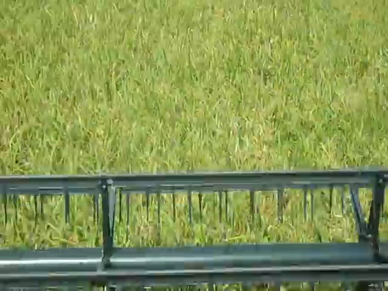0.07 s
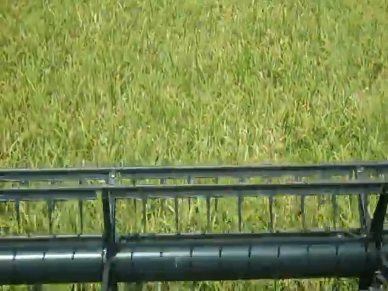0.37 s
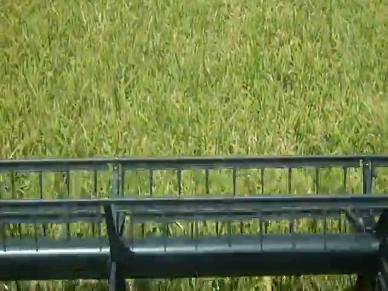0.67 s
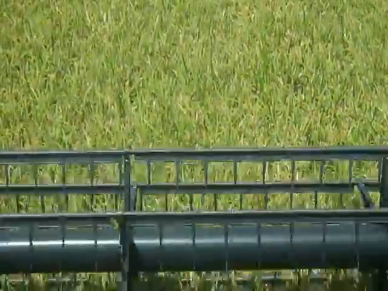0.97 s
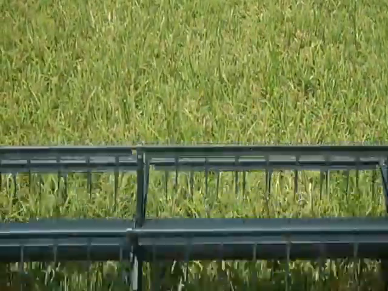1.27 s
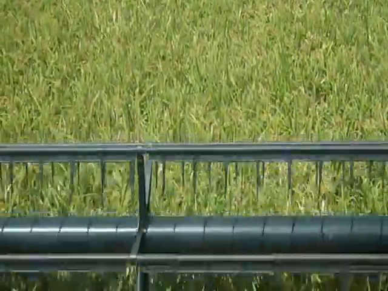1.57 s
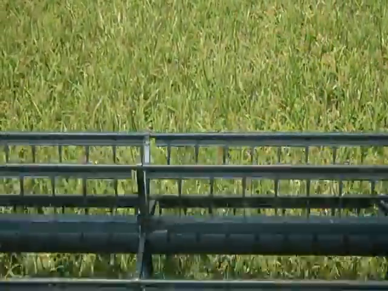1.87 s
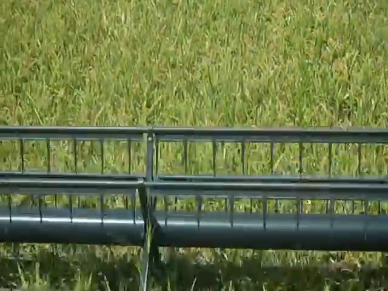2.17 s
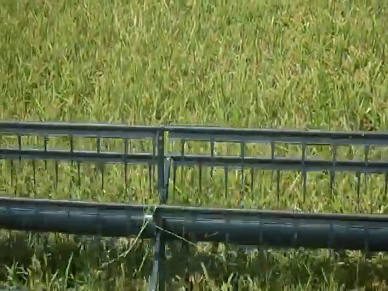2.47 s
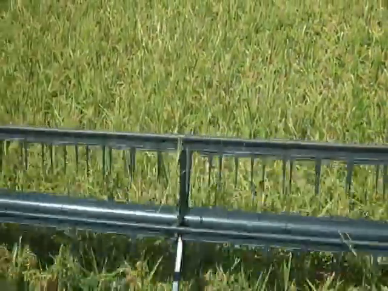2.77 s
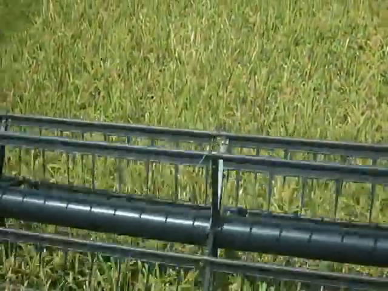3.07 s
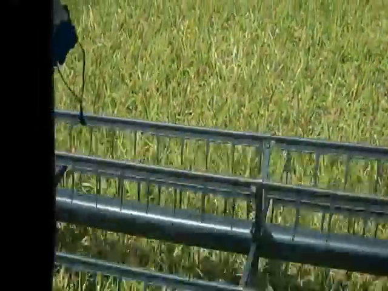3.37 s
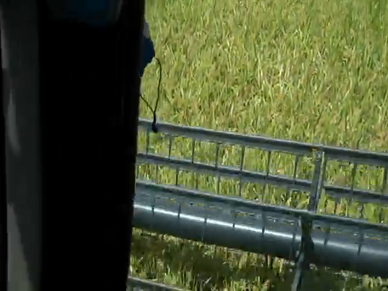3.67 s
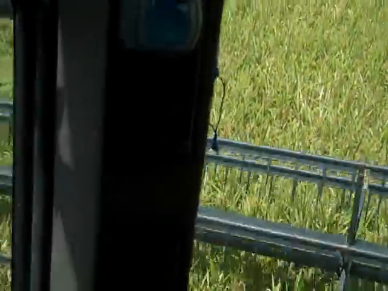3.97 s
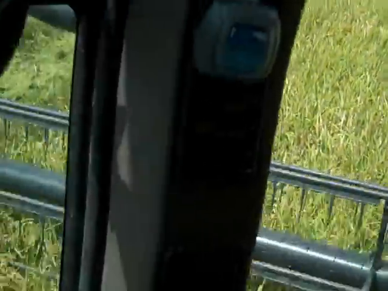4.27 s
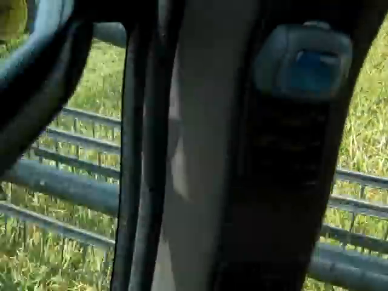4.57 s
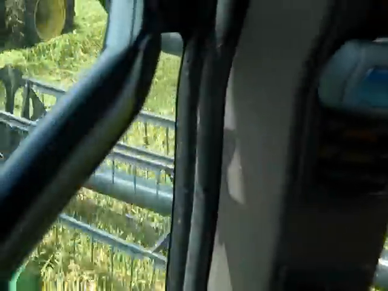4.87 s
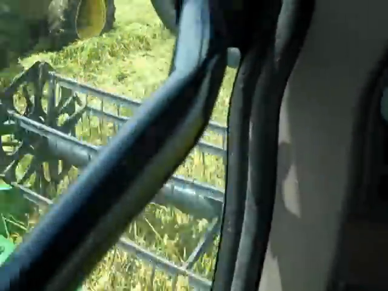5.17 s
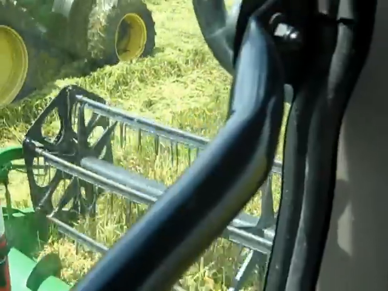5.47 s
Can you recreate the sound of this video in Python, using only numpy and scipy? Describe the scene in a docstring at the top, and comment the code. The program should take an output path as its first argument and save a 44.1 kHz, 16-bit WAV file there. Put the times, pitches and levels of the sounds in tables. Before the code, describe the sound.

A combine harvester cuts grain at full throttle, heard from inside the cab. A deep hum and boom stutter in, then throb steadily under the hiss and rattle of crop, thin gear whines and a faintly ringing loose guard. Gusts of air thump the hand-held microphone and a few knocks sound nearby. Past the middle the level dips briefly, a puff makes a sharp click on the left, and the hiss shifts colour as the microphone turns.

```python
"""A deep hum and boom stutter in: a combine harvester cutting grain at full throttle, from inside the cab.
The diesel and its drives hum, the cab booms, surges and throbs with the cutter, crop hisses and rattles
through the header, gears whine and a loose guard rings. The hand-held microphone turns from the
windscreen to the side window; gusts and puffs of air thump it, and on the hardest puff the left channel
overloads and clicks. Now and then something knocks in the cab, or the level dips briefly."""
import sys
import numpy as np
from scipy import signal
from scipy.fft import rfft, irfft
from scipy.io import wavfile
from scipy.ndimage import uniform_filter1d, map_coordinates

SR = 44100
rng = np.random.default_rng(int(sys.argv[2]) if len(sys.argv) > 2 else 0)


def materialize(psi):
    """Save the field psi as 16-bit PCM at rate SR to the path in sys.argv[1].

    A 1-D psi becomes a single channel; in a 2-D psi each row is a channel.
    """
    bounded = np.clip(np.atleast_2d(psi).T, -1, 1)
    quanta = np.round(bounded * 32767).astype(np.int16)
    wavfile.write(sys.argv[1], SR, quanta)


N = 247842
TIME_S = np.arange(N) / SR
CRANK_HZ, THROB_HZ = 37.7, 8.183   # usual crank speed; the cutter's throb


# The governed crank speed, sagging under load: time_s, speed_hz
CRANK_SPEED = [(0, 37.76), (1.4, 37.76), (1.9, 37.59), (2.4, 37.59), (2.8, 37.77), (3.6, 37.72),
               (4.7, 37.72), (5.2, 37.8)]
def crankshaft():
    """Turns made so far by the diesel's crank."""
    return np.cumsum(in_time(CRANK_SPEED)) / SR


# The diesel, heard from the cab: crank_multiple, level_db
DIESEL_ORDERS = [(1, -37), (2, -38), (30, -48.5)]
# Shafts and belts at the usual crank speed: pitch_hz, level_db
SHAFT_TONES = [(29.2, -33), (50.3, -33.5), (106.5, -32.5), (114.2, -30)]
# Lines beating around the fifth and tenth crank orders: crank_multiple, throb_multiple, level_db, lag_s
CHUG_LINES = [(5, -3, -39, 0), (5, -2, -33.5, 0), (5, -1, -29.5, 0), (5, 0, -27.5, 0), (5, 1, -37.5, 0),
              (5, 2, -41, 0), (10, 0, -33, .03), (10, 1, -39, .03)]
# The chugging grows and eases with the load: time_s, gain_db
CHUG_LOAD = [(0.4, -.5), (0.7, 0), (1.25, 0.5), (1.5, 2), (2.2, -1.5), (2.55, -1.5), (2.95, -2), (3.15, 1),
             (3.7, -0.5), (4.15, 1.5), (4.6, -2.5), (5.5, -0.5)]
def engine(crank, throb):
    """The diesel and its shafts hum; lines around the fifth and tenth crank orders fall in step once a throb
    and chug."""
    diesel = sum(from_db(db) * tone(order * crank, waver_db=3.5) for order, db in DIESEL_ORDERS)
    shafts = sum(from_db(db) * tone(hz / CRANK_HZ * crank, waver_db=1) for hz, db in SHAFT_TONES)
    chug = 0
    for order, step, db, lag_s in CHUG_LINES:
        turns = order * crank + step * (throb - lag_s * THROB_HZ)
        chug += np.sqrt(2) * np.cos(2 * np.pi * turns) * from_db(db + .8 * drift(2))
    return diesel + shafts + chug * from_db(in_time(CHUG_LOAD))


# The boom of the cab, all round the microphone: frequency_hz, level_db
BOOM_SPECTRUM = [(45, -23), (62, -6), (85, 0), (100, 0.5), (125, -3.5), (145, 2), (165, -4), (195, -9),
                 (230, -13.5), (300, -16)]
# Its slow rise and fall: time_s, level_db
BOOM_SWELL = [(0.3, -19.5), (0.65, -15.5), (1.1, -16.5), (1.7, -20.5), (2.0, -16), (2.55, -19.5),
              (3.05, -16.5), (3.7, -15.5), (4.85, -17.5), (5.45, -13.5)]
def cab_boom(stroke):
    """Dense knocks from the threshing gear boom in the cab, throbbing with the cutter's stroke."""
    boom = steady(in_cab(impacts(per_s=1500, spread_db=2), BOOM_SPECTRUM), span_s=.12)
    return boom * from_db(in_time(BOOM_SWELL) + stroke)


# Brief low swells of the boom in the cab: peak_s, half_length_s, pitch_hz, level_db
BOOM_SURGES = [(0.313, 0.014, 123.0, -8.5), (0.615, 0.013, 118.0, -12.5), (0.661, 0.027, 100.0, -11.8),
               (0.818, 0.02, 114.0, -16.5), (0.89, 0.027, 103.0, -16), (0.95, 0.022, 138.0, -14),
               (1.925, 0.012, 111.0, -15), (1.996, 0.019, 114.0, -10), (2.187, 0.02, 105.0, -13.1),
               (2.275, 0.021, 114.0, -10.5), (2.823, 0.01, 114.0, -9), (2.953, 0.0084, 107.0, -7),
               (3.188, 0.0082, 113.0, -15), (3.596, 0.014, 105.0, -15), (3.647, 0.019, 110.0, -12.0),
               (3.833, 0.015, 122.0, -10.5), (3.964, 0.026, 101.0, -14.5), (4.185, 0.016, 125.0, -14),
               (4.406, 0.012, 102.0, -11), (4.488, 0.017, 125.0, -12), (4.694, 0.014, 121.0, -13.5),
               (4.992, 0.022, 112.0, -11.5), (5.067, 0.01, 104.0, -6.5), (5.245, 0.013, 118.0, -12),
               (5.327, 0.019, 112.0, -12.1), (5.42, 0.027, 101.0, -13.5), (5.459, 0.016, 120.0, -10),
               (5.545, 0.016, 118.0, -11.5)]
def boom_surges(trim_db=-1):
    """The boom peaks briefly near one pitch; returns the sound and the surges' envelope (0-1)."""
    sound = envelope = 0
    for peak_s, half_s, hz, db in BOOM_SURGES:
        swell = bell(peak_s, half_s)
        sound += from_db(db + trim_db) * swell * tone(hz * TIME_S, waver_db=0, spread=.089)
        envelope += swell
    return sound, np.minimum(envelope, 1)


# The cab's panels, close by: frequency_hz, level_db
PANEL_SPECTRUM = [(180, 4), (230, 3), (310, -2), (370, -1), (430, 1), (470, -3.5), (520, -2), (620, -4.5),
                  (680, -11.5), (860, -13.5), (1100, -25), (1600, -24)]
def panel_rumble(stroke, turn, aside):
    """The threshing gear rumbles in the panels; at the side window the door adds a hollow resonance."""
    panels = steady(in_cab(impacts(per_s=6000, spread_db=-.5), PANEL_SPECTRUM), span_s=.069)
    door = boost(panels, hz=287, width_hz=76, db=3.5) - panels
    return (panels + aside * door) * from_db(-23.5 + turn + .39 * stroke)


# The lowest rumble in the cab: frequency_hz, level_db
SHAKE_SPECTRUM = [(10, -26), (19, -4.5), (29, -4.5), (40, 0), (52, -3.5), (64, -9.5), (85, -9)]
def cab_shake(swell_db):
    """The cab shakes with a deep noise that follows the swell of the crop."""
    shake = steady(in_cab(rng.standard_normal((2, N)), SHAKE_SPECTRUM), span_s=.106)
    return shake * from_db(-23.5 + swell_db)


# Crop hiss at the windscreen and at the side window: frequency_hz, level_db
WINDSCREEN_HISS = [(600, 7), (950, 3.5), (1350, 3), (1750, -0.5), (2300, 1.5), (2900, -1.5), (4000, -1.5),
                   (5100, -5.5), (6500, -3), (8000, -6), (9200, -15.5), (10200, -18.5), (13300, -29.5),
                   (14300, -36)]
SIDE_HISS = [(600, 8), (950, 7.5), (1350, -0.5), (1750, 1.5), (2300, 0.5), (2900, 0.5), (4000, -2),
             (5100, -1.5), (6500, -8), (8000, -5), (9200, -12.5), (10200, -18.5), (13300, -27),
             (14300, -38)]
# Sheet metal ringing, from the same two places: pitch_hz, width_hz, boost_db
WINDSCREEN_RINGS = [(1400, 91, -2.5), (2910, 72, 3), (4490, 270, 2), (6400, 85, -1)]
SIDE_RINGS = [(1200, 40, 0.97), (1360, 240, 5.2), (2670, 310, 1.1), (4300, 240, 0.74), (6060, 610, 1.8)]
def crop(stroke, aside):
    """Stalks and grain pelt sheet metal: a hiss shaken by the engine and coloured by each window."""
    crank_angle = 2 * np.pi * spin(CRANK_HZ, wander_hz=.23)
    engine_db = .04 * np.sin(crank_angle) + .17 * np.sin(2 * crank_angle)
    shaking_db = engine_db + .2 * drift(65) + .12 * stroke
    windows = []
    for spectrum, rings in (WINDSCREEN_HISS, WINDSCREEN_RINGS), (SIDE_HISS, SIDE_RINGS):
        hiss = in_cab(window_echoes(impacts(per_s=16000, spread_db=.8)), spectrum)
        for hz, width_hz, db in rings:
            hiss = boost(hiss, hz, width_hz, db)
        windows.append(hiss)
    windscreen, side = windows
    return (np.sqrt(1 - aside) * windscreen + np.sqrt(aside) * side) * from_db(shaking_db)


def window_echoes(x, echo_db=-11, t60_s=.1):
    """Quick reflections between the cab windows give a hollow, rippled colour."""
    t = TIME_S[:4096]
    echoes = rng.standard_normal((2, len(t))) * from_db(-60 * t / t60_s) * (t > .002)
    echoes *= from_db(echo_db) / np.sqrt(np.sum(echoes ** 2, axis=1, keepdims=True))
    return x + signal.fftconvolve(x, echoes, axes=1)[:, :N]


# Bands of hiss along the microphone's turn: centre_hz, width_hz, gain_db, turn_share
REFLECTED_BANDS = [(2570, 1100, 3, 0.42), (3000, 200, 2.5, 0.62), (4600, 370, 3, 0.17),
                   (5440, 260, 4, 0.43), (5970, 300, 4.5, 0.42), (6500, 400, 4, 0.56), (6780, 130, 5, 0.66),
                   (1420, 240, 10, 0.83), (3880, 1800, 3.5, 0.75), (4900, 250, -3, 0.46),
                   (5080, 250, -6, 0.55), (1680, 170, -6, 0.61)]
def reflections(hiss, turn, reach=.13):
    """Reflections bring out or cancel each band as the microphone passes its place."""
    for hz, width_hz, db, place in REFLECTED_BANDS:
        nearness = np.exp(-((turn - place) / reach) ** 2)
        hiss = hiss + nearness * (boost(hiss, hz, width_hz, db) - hiss)
    return hiss


# Gears and fans through the glass: pitch_hz, windscreen_db, side_window_db, wander_hz
GEAR_WHINES = [(493, -36, -39.5, .8), (507, -38.5, -43, 1.5), (517, -41, -50, 1.5), (985, -54, -45, 3),
               (1233, -49.5, -48.5, 1), (2763, -55, -54, 4), (3547, -54, -53, 5), (4186, -49, -52, 5),
               (6080, -55.5, -57, 11), (6449, -55, -62, 8)]
def gears(aside):
    """Gear meshes and fans whine, each louder at one window; high ones differ more left to right."""
    whine = 0
    for hz, ahead_db, aside_db, wander_hz in GEAR_WHINES:
        level_db = ahead_db + aside * (aside_db - ahead_db)
        whine += from_db(level_db) * tone(spin(hz, wander_hz), waver_db=2.5, spread=hz / 5000)
    return whine


# The most prominent gear whine, heard from the cab: time_s, level_db
SINGING_LEVEL = [(0.2, -48), (1.7, -48.5), (2.25, -44.5), (2.4, -48.5), (2.6, -44), (2.85, -41.5),
                 (3.15, -40.5), (3.25, -47.5), (3.5, -47.5), (3.65, -44.5), (3.95, -46), (4.7, -57)]
def singing_gear():
    """One gear sings out over the others; returns the sound and its swell in dB."""
    level_db = in_time(SINGING_LEVEL)
    whine = tone(spin(hz=2533.5, wander_hz=1.2), waver_db=1, spread=.31)
    return whine * from_db(level_db + 1.8 * drift(14)), level_db - np.median(level_db)


# Modes of a loose steel guard: pitch_hz, width_hz, level_db
GUARD_MODES = [(2565, 34, 0), (2618, 26, 0)]
def guard(crank, uneven_db=4):
    """A loose guard is tapped about once a turn of the crank and rings in a flutter; rms 1."""
    turns = np.floor(crank + .2 * drift(30))
    taps = np.diff(turns, prepend=turns[0]) > 0
    ringing = 0
    for hz, width_hz, db in GUARD_MODES:
        blows = taps * rng.choice([-1, 1], (2, N)) * from_db(uneven_db * rng.standard_normal(N))
        radius, angle = np.exp(-np.pi * width_hz / SR), 2 * np.pi * hz / SR
        mode = signal.lfilter([1], [1, -2 * radius * np.cos(angle), radius ** 2], blows + 1e-18)
        ringing += from_db(db) * rms_one(mode)
    return in_cab(ringing, [(1500, 0), (4000, 0)])


# Knocks close by in the cab: start_s, body_db, crack_db
CAB_KNOCKS = [(0.2975, -20, -14.5), (1.085, -28, -25), (2.708, -12, -48)]
# Their hollow body: frequency_hz, level_db
KNOCK_SPECTRUM = [(200, -14), (330, 0), (390, 0), (470, -12), (650, -16), (1200, -28)]
def knocks(rise_s=.003, body_decay_s=.026, crack_decay_s=.005):
    """Something knocks: a short crack and a hollow body that builds behind it, both dying fast."""
    body = in_cab(rng.standard_normal((2, N)), KNOCK_SPECTRUM)
    crack = in_cab(rng.standard_normal((2, N)), WINDSCREEN_HISS)
    out = 0
    for start_s, body_db, crack_db in CAB_KNOCKS:
        age = TIME_S - start_s
        out += body * from_db(body_db) * np.clip(age / rise_s, 0, 1) * np.exp(-abs(age) / body_decay_s)
        out += crack * from_db(crack_db) * (age >= 0) * np.exp(-abs(age) / crack_decay_s)
    return out


# Moving air, right on the microphone: frequency_hz, level_db
DRAUGHT_SPECTRUM = [(15, -6), (28, -2), (60, -6), (110, 6), (170, -6), (300, -9.5), (420, -6.5), (700, -33),
                    (1200, -36)]
# Its gusts: peak_s, half_length_s, level_db, left_minus_right_db
DRAUGHT_GUSTS = [(0.37, 0.098, -24, -7), (0.81, .035, -21, 8), (0.95, 0.029, -23, 7), (1.35, .04, -21, 4),
                 (1.63, 0.19, -23.5, 0), (1.88, 0.059, -16.5, -3.5), (2.24, 0.16, -23, 0),
                 (2.38, 0.043, -11.5, -4), (2.56, 0.06, -19.5, -6), (2.71, 0.045, -17, -3),
                 (3.03, .05, -23, -8), (3.165, 0.042, -17, 7), (3.31, 0.043, -23.5, 11),
                 (3.67, 0.035, -30, 8), (3.95, .04, -23, -10)]
def draught(swell_db, rest_db=-36.5):
    """Air from the cab blower flutters on each microphone port by itself: a light flow, and gusts."""
    flutter = from_db(-np.array([drift(4), drift(4)]))
    air = rms_one(colour(rng.standard_normal((2, N)) * flutter, DRAUGHT_SPECTRUM))
    gust_power = sum((from_db(db) * pan(side_db) * bell(peak_s, half_s)) ** 2
                     for peak_s, half_s, db, side_db in DRAUGHT_GUSTS)
    return air * np.sqrt(from_db(rest_db + swell_db) ** 2 + gust_power)


# Puffs of air striking the microphone: peak_s, height, width_s, left_minus_right_db
AIR_PUFFS = [(0.1295, .42, .001, 0), (0.1353, .5, .0011, 0), (0.145, .4, .0007, 0),
             (0.1995, -.45, .0016, 0), (0.245, .4, .0012, 0), (0.3025, .6, .0005, 0),
             (0.3195, .35, .0012, 0), (2.265, .4, .0012, 0), (2.292, .4, .001, -9), (2.535, .4, .0015, -8),
             (2.7248, .45, .0006, -5), (3.185, .45, .0016, 4), (3.281, .3, .0007, 12),
             (3.305, .3, .0009, 6), (3.418, .28, .001, 8), (3.6885, .62, .0012, 7)]
def puffs():
    """Each puff is one push of pressure with a rebound before and after."""
    out = 0
    for peak_s, height, width_s, side_db in AIR_PUFFS:
        offset = (TIME_S - peak_s) / (2 * width_s)
        out += height * (1 - 2 * offset ** 2) * bell(peak_s, 2 * width_s) * pan(side_db)
    return out


def overload_click(start_s=3.68855, height=2.15, hz=9400):
    """The left channel overloads and clicks sharply: two spikes set on the crest of the hardest puff."""
    cycles = (TIME_S - start_s) * hz
    pulses = np.sin(np.pi * cycles) ** 2 * ((cycles > 0) & (cycles < 2))
    return -height * pulses * np.array([[1], [0]])


# Brief dips in level at the microphone: start_s, hold_s, hiss_depth_db, drone_depth_db
LEVEL_DIPS = [(2.312, 0.18, 3.5, 2.5), (2.736, 0.024, 1.8, 5), (3.188, 0.32, 7.5, 6.2),
              (3.197, 0.034, 1.5, 2.5), (3.71, 0.18, 2, 2), (4.325, 0.027, 1, 3), (4.897, 0.046, 2, 2)]
def dips(fall_s=.016, rise_s=.048, creep_per_s=1.35, sag_s=.049):
    """Each dip falls quickly, holds and rises again; dB lost by the hiss, the panels and the boom."""
    hiss = panels = boom = 0
    for start_s, hold_s, hiss_db, drone_db in LEVEL_DIPS:
        age = TIME_S - start_s
        shape = np.clip(age / fall_s + .5, 0, 1) * np.clip(1 - (age - hold_s) / rise_s, 0, 1)
        hiss += hiss_db * shape * np.exp(-creep_per_s * abs(age))   # creeps back during the hold
        panels += 1.15 * drone_db * shape
        boom += drone_db * shape * (1 + .43 * bell(start_s, sag_s))   # sinks further at first
    return hiss, panels, boom


# The opening stutter: start_s, end_s, gain_db
STUTTER_STEPS = [(0.147, 0.1895, -23), (0.1895, 0.201, 5.5), (0.201, 0.242, -4)]
def stutter(start_s=.109, edge_s=.002):
    """Gain of a sound that cuts in, drops out and jumps before it settles, and cuts off at the end."""
    jumps_db = sum(db * ((TIME_S >= begin) & (TIME_S < end)) for begin, end, db in STUTTER_STEPS)
    silent = (TIME_S < start_s) | (TIME_S > TIME_S[-1] - edge_s)
    return from_db(uniform_filter1d(np.where(silent, -75, jumps_db), int(edge_s * SR)))


# How alike the cab sounds at the microphone's two ports: frequency_hz, correlation
PORT_LIKENESS = [(30, 0.52), (70, 0.975), (130, 0.97), (300, 0.99), (640, 0.97), (1400, 0.85), (3100, 0.76),
                 (4800, 0.35), (6800, 0.35), (12000, 0.14)]
def in_cab(drives, spectrum):
    """Two unrelated drives become the stereo sound in the cab, alike in the bass; rms 1."""
    alike = per_bin(PORT_LIKENESS)
    mid, side = rfft(drives) * np.sqrt([1 + alike, 1 - alike])
    stereo = irfft(np.array([mid + side, mid - side]), N)
    return rms_one(colour(stereo, spectrum))


def impacts(per_s, spread_db):
    """Two trains of random small blows of uneven size; rms 1."""
    sizes = from_db(spread_db * np.minimum(rng.exponential(1, N), 4))
    return rms_one((rng.random(N) < per_s / SR) * sizes * rng.standard_normal((2, N)))


def tone(turns, waver_db, spread=.15):
    """A wavering line of about unit rms; standing waves shift it between the two sides."""
    phase = 2 * np.pi * (turns + rng.random()) + spread * drift(.67) * np.array([[1], [-1]])
    return np.sqrt(2) * np.sin(phase) * from_db(waver_db * drift(3.5))


def spin(hz, wander_hz):
    """Turns made by a shaft whose speed wanders."""
    return np.cumsum(hz + wander_hz * drift(2.026)) / SR


def drift(rate):
    """A smooth random curve of rms 1, changing about rate times a second."""
    pole = np.exp(-80 * np.pi * rate / SR)
    noise = rng.standard_normal(N // 40 + 2002)   # one value per 40 samples, plus time to settle
    slow = signal.lfilter([1], [1, -2 * pole, pole * pole], noise)[2000:]
    return np.interp(np.arange(N) / 40, np.arange(len(slow)), rms_one(slow))


def boost(x, hz, width_hz, db):
    """Raise or lower one resonant band by db."""
    radius = np.exp(-np.pi * width_hz / SR)
    poles = [1, -2 * radius * np.cos(2 * np.pi * hz / SR), radius ** 2]
    band = signal.lfilter(np.array([1, 0, -1]) * (1 - radius ** 2) / 2, poles, x)
    return x + (from_db(db) - 1) * band


def colour(x, spectrum):
    """Filter by rows of frequency_hz, level_db, falling steeply beyond both ends."""
    (low_hz, low_db), (high_hz, high_db) = spectrum[0], spectrum[-1]
    closed = [(low_hz / 2, low_db - 30), *spectrum, (high_hz * 4, high_db - 60)]
    return irfft(rfft(x) * from_db(per_bin(closed)), N)


def steady(x, span_s):
    """Hold the slow level of a stereo sound at 1, keeping its fast grain."""
    return x / np.sqrt(uniform_filter1d(np.mean(x ** 2, axis=0), int(span_s * SR)) + 1e-9)


def bell(peak_s, half_s):
    """A swell that rises to 1 at peak_s and fades again."""
    return np.exp(-np.minimum(((TIME_S - peak_s) / half_s) ** 2, 50))


def in_time(points):
    """A curve over time, read at every sample."""
    return np.interp(TIME_S, *np.transpose(points))


def per_bin(points):
    """A curve over log frequency, read at every bin."""
    hz, value = np.transpose(points)
    return np.interp(np.log(np.arange(N // 2 + 1) * SR / N + 1e-9), np.log(hz), value)


def pan(db):
    """Left and right gains for a level difference."""
    return from_db(np.array([[.5], [-.5]]) * db)


def from_db(db):
    """Decibels to gain."""
    return 10 ** (np.asarray(db) / 20)


def rms_one(x):
    """Scale to unit rms."""
    return x / np.sqrt(np.mean(x ** 2) + 1e-20)


# The microphone turns from the windscreen (0) towards the side window (1): time_s, turn_share
MICROPHONE_TURN = [(2.4, 0.06), (3.45, 0.16), (3.85, 0.37), (4.7, 0.66), (5.6, 0.71)]
# Hiss of the crop running through the machine: time_s, level_db
CROP_FLOW = [(0.3, -28.5), (0.7, -26.5), (1.2, -27.5), (1.65, -28), (2.5, -26.5), (3.15, -28.5),
             (3.57, -26.5), (4.35, -28.5), (4.68, -26), (4.95, -29), (5.45, -29), (5.62, -33.5)]
def scene():
    """All the machinery from inside the cab, throbbing and dipping while the microphone turns."""
    turn = in_time(MICROPHONE_TURN)
    aside = np.clip((turn - .051) / .35, .03, .92)   # the side window takes over past the cab pillar
    crank, throb = crankshaft(), THROB_HZ * TIME_S
    stroke = np.cos(2 * np.pi * throb)
    hiss_dip_db, panel_dip_db, boom_dip_db = dips()
    surges, surging = boom_surges()
    hiss_db = in_time(CROP_FLOW) - hiss_dip_db + .45 * drift(3)
    swell_db = hiss_db - np.median(hiss_db)

    hum = engine(crank, throb) * from_db(1 - .7 * boom_dip_db)
    whine = gears(aside) * from_db(1.2 + 1.5 * swell_db)
    singing, singing_swell_db = singing_gear()
    ringing = guard(crank) * from_db(-41.5 + .5 * aside + .25 * singing_swell_db + .45 * swell_db)
    shake = cab_shake(swell_db)
    hiss = reflections(crop(stroke, aside), turn) * from_db(hiss_db)
    boom = cab_boom(stroke) * from_db(-boom_dip_db - 5 * surging)   # gives way under the surges
    rumble = panel_rumble(stroke, turn, aside) * from_db(-panel_dip_db)
    left, right = hum + boom + rumble + shake + hiss + whine + singing + ringing

    lag_ms = np.interp(turn, [0, 1], [-.071, .084])   # the left port leads at first, then lags
    left = map_coordinates(left, [np.arange(N) - lag_ms * SR / 1000], order=3, mode="nearest")
    return (np.array([left, right]) + draught(swell_db)) * stutter() + surges + knocks() + puffs()


# The microphone's ports, left then right: pitch_hz, width_hz, boost_db
PORT_RESONANCES = [(7740, 1000, 5.5), (6550, 1190, 8.5)]
# Balance between them: frequency_hz, left_minus_right_db
PORT_BALANCE = [(30, -2), (90, -0.8), (600, -0.7), (2000, -0.5), (4000, -2.5), (6000, -3.5), (8000, 6.5),
                (9500, 7), (11000, 9.5), (14000, 12.5)]
def record(dry, cutoff_hz=14850):
    """Each microphone port rings at its own pitch; peaks clip, one overload clicks and the top is cut."""
    ported = np.array([boost(side, *port) for side, port in zip(dry, PORT_RESONANCES)])
    tilted = irfft(rfft(ported) * pan(per_bin(PORT_BALANCE)), N)
    lowpass = signal.ellip(10, .1, 80, cutoff_hz, fs=SR, output="sos")
    return signal.sosfilt(lowpass, np.clip(tilted, -1, 1) + overload_click())


dry = scene()
out = record(dry)
materialize(out)
```